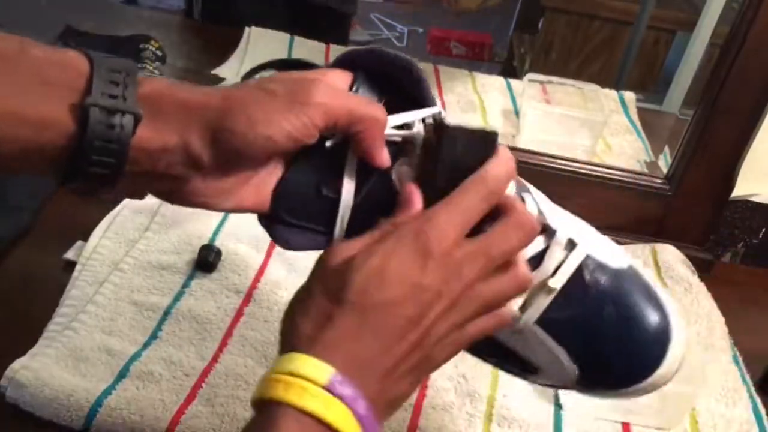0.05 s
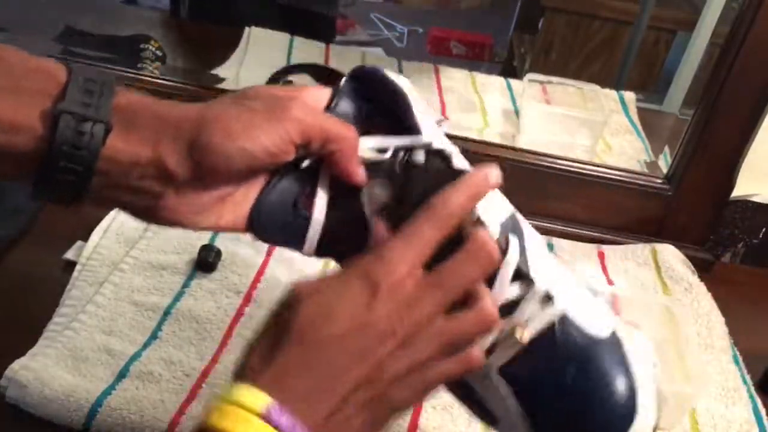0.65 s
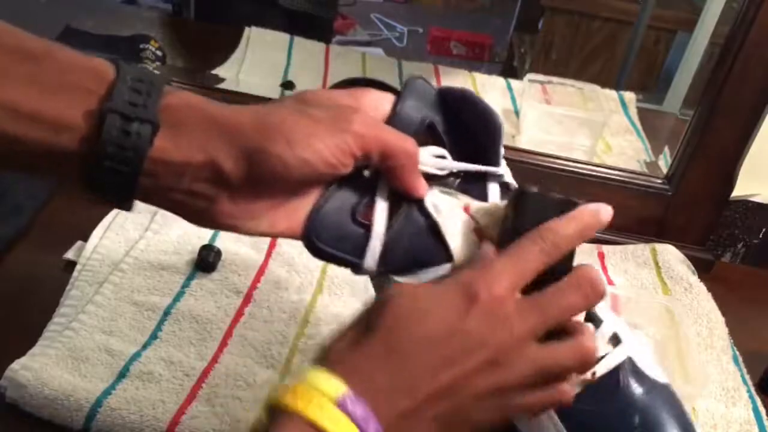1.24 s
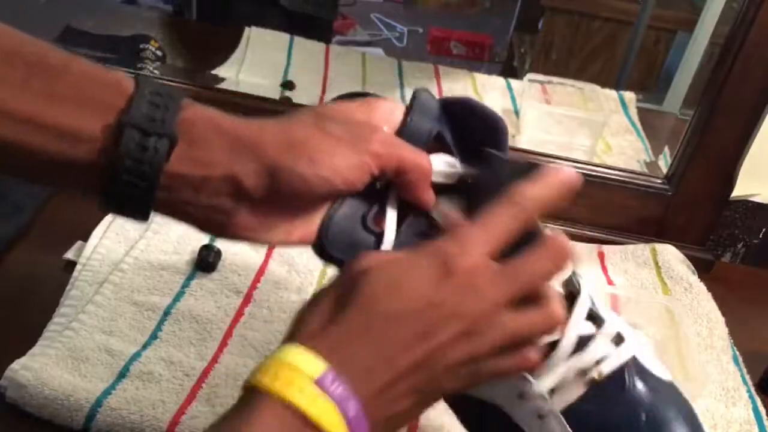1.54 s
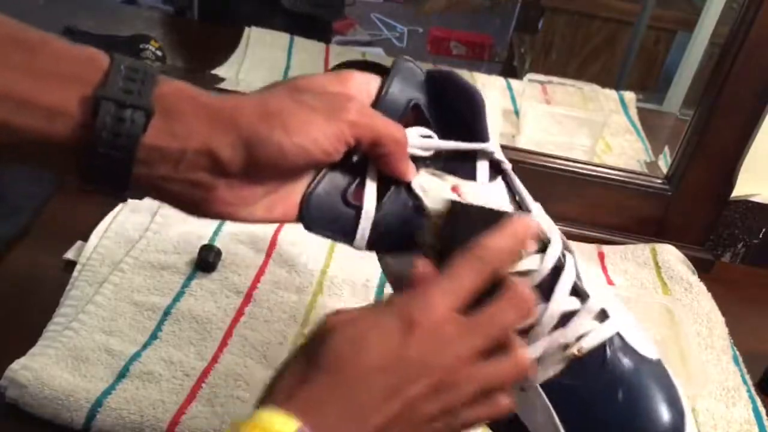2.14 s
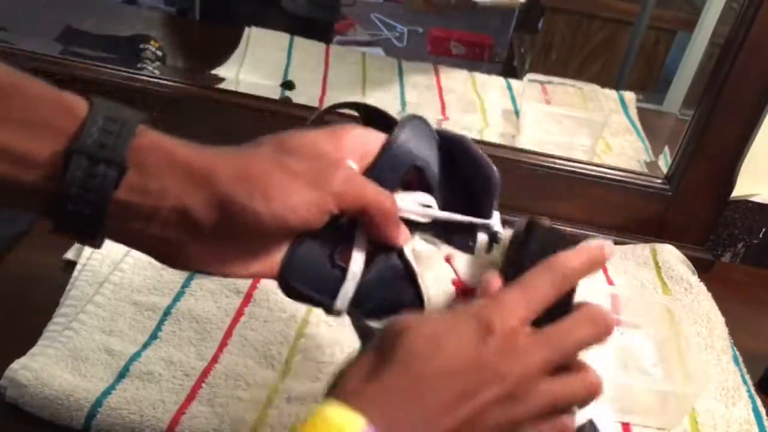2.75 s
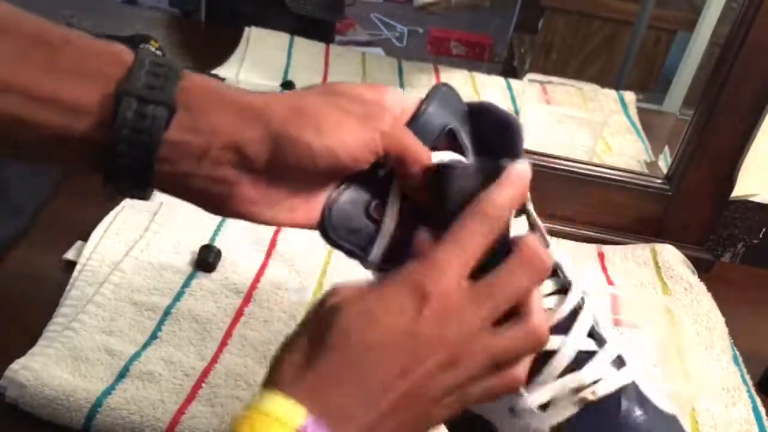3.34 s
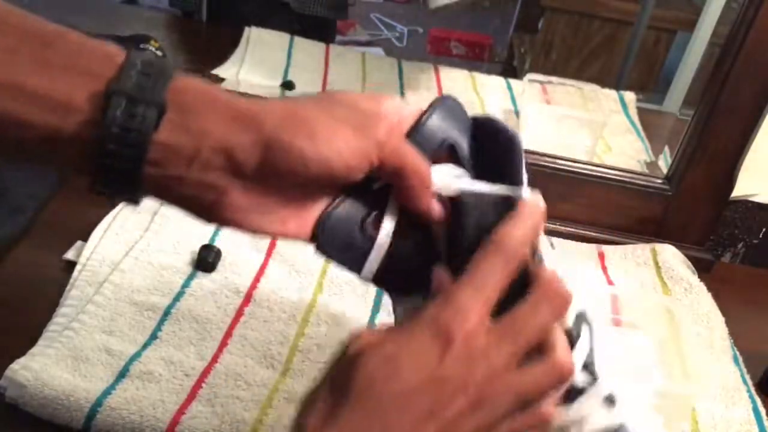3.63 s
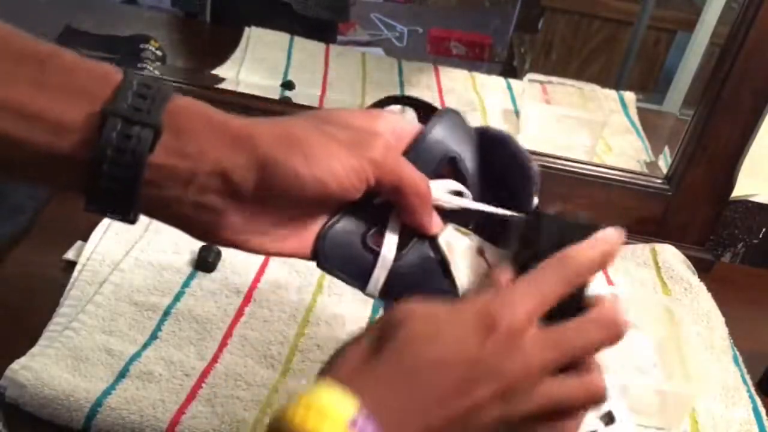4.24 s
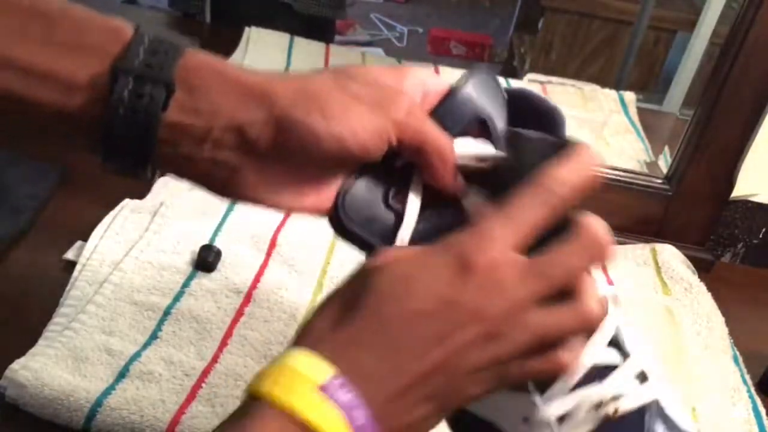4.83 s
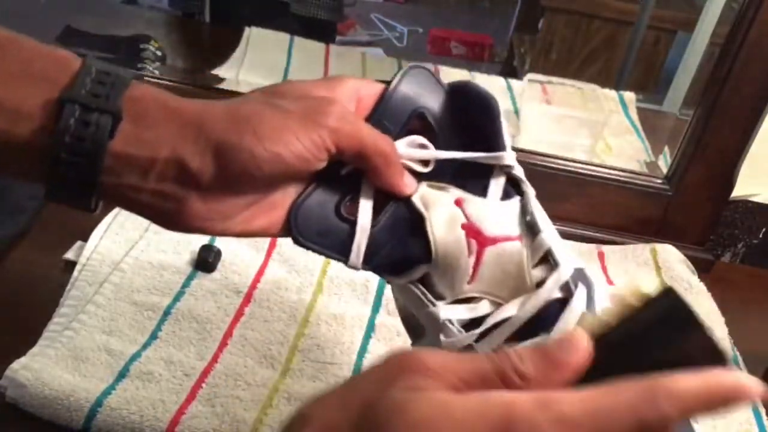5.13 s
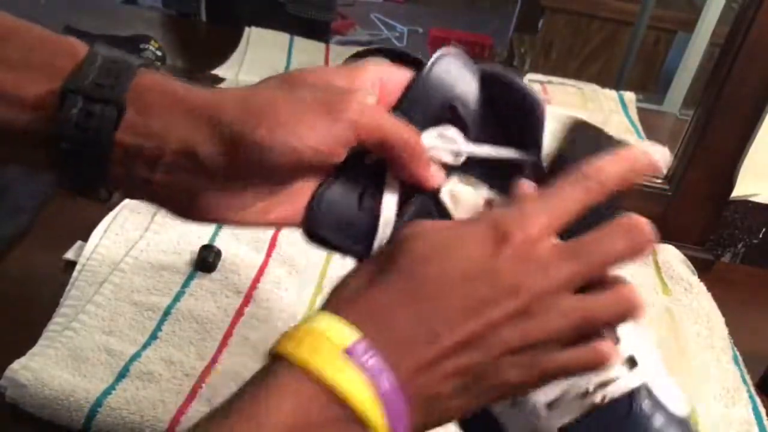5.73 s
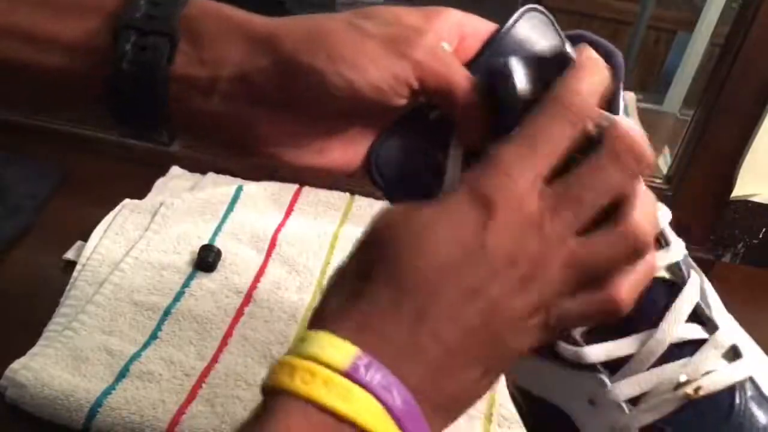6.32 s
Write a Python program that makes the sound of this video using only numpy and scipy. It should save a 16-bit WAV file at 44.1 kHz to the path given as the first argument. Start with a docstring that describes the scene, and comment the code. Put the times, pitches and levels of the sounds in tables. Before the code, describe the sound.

A small brush scrubs the wet fabric tongue of a sneaker, about eight strokes a second, with a bright hiss and a dry rasp. The hollow shoe murmurs under the rubbing and gives soft knocks when bumped. Near the end the brush lifts for a moment, slides softly over a lace and scrubs again. The sound is close, in a furnished room with a low rumble and machine hum.

```python
"""A small brush scrubs the wet tongue of a sneaker, about eight strokes a second, close by indoors.
Stick-slip friction makes the bristle tips hiss on the fabric and the bent bristles rasp in their block.
The hollow shoe resonates: it murmurs under the rubbing and knocks when bumped.
The brush lifts once for a moment, then settles with a soft slide over a lace.
The room adds faint reflections, and a low rumble with a machine hum lies underneath."""
import sys
import numpy as np
from scipy import signal
from scipy.fft import rfft, irfft
from scipy.io import wavfile

SR = 44100
rng = np.random.default_rng(int(sys.argv[2]) if len(sys.argv) > 2 else 0)


def store_pcm(level_fs):
    """Save levels as 16-bit WAV."""
    pcm = np.round(np.clip(level_fs, -1, 1) * 32767).astype(np.int16)
    wavfile.write(sys.argv[1], SR, np.atleast_2d(pcm).T)


N = 285327
TIME = np.arange(N) / SR
BINS = np.maximum(np.arange(N // 2 + 1) * SR / N, 1)


# spectra of tips on fabric and of bent bristles dragging: (frequency [Hz], level [dB])
HISS_SPECTRUM = [(500, -6.5), (1200, -9.5), (2200, -13), (3500, -2.5), (5400, -3.5), (7000, -3), (9300, -2),
                 (11500, -1), (13000, 0), (15800, -1)]
RASP_SPECTRUM = [(300, -8), (700, -10), (1000, -9), (1300, -7.5), (1600, -1.5), (2300, -2), (3000, -1.3),
                 (3800, -5.5), (5000, -15), (8000, -47), (15000, -38)]
# resonances and antiresonances of brush block and cupped hand: (frequency [Hz], width [Hz], gain [dB])
BRUSH_RESONANCES = [(1600, 380, 0.5), (2242, 116, 7), (2405, 110, 5), (2640, 230, -2), (2750, 114, 5),
                    (7900, 1130, -3.5), (10450, 780, -4)]
# colour of tips pushed against their lean, and trailing: (frequency [Hz], width [Hz], gain [dB])
PUSHED_BANDS = [(3630, 480, -11), (6180, 1140, 2.5), (11100, 4900, -0.5)]
TRAILING_BANDS = [(3460, 3100, 2), (4640, 280, 0.5), (5530, 1000, 2.5), (8270, 540, 2), (12300, 13000, 4.5)]

def bristles(drive, speed, bend, push_share, rasp_ratio):
    """Stick-slip friction: tips slip over the weave, more often at speed, and the clicks fuse to noise."""
    flutter = undb(0.54 * walk(104))  # tufts catch and let go together
    hiss = 0
    for share, lean in [(push_share, PUSHED_BANDS), (1 - push_share, TRAILING_BANDS)]:
        tips = slips(9000 + 30000 * speed, spread_db=2)
        hiss += np.sqrt(share) * colour(tips, HISS_SPECTRUM, BRUSH_RESONANCES + lean)
    rasp = colour(slips(4000 + 8000 * speed, spread_db=1), RASP_SPECTRUM, BRUSH_RESONANCES)
    rasp *= undb(0.5 * walk(61))
    # the rasp grows with the bend and depends less on speed than the hiss
    bite = undb(-3 + bend * (2 + push_share)) * rasp_ratio / speed ** 0.28
    pressure = undb(0.5 * walk(17))
    return drive * pressure * flutter * (undb(2.18) * hiss + bite * rasp)


# strokes, drawn and pushed in turn, a draw first: (time [s], duration [s], level [dB])
BRUSH_STROKES = [(0.006, 0.092, -52), (0.04, 0.12, -62.5), (0.175, 0.14, -46.5), (0.33, 0.12, -47.5),
                 (0.44, 0.135, -44), (0.559, 0.17, -49.0), (0.67, 0.15, -44.5), (0.787, 0.18, -45.0),
                 (0.919, 0.128, -41), (1.023, 0.174, -44.0), (1.155, 0.14, -39.5), (1.265, 0.189, -44.5),
                 (1.41, 0.13, -39.5), (1.49, 0.21, -44.5), (1.647, 0.13, -39.5), (1.739, 0.2, -43.0),
                 (1.879, 0.15, -39), (2.007, 0.21, -42.5), (2.125, 0.18, -40), (2.28, 0.16, -45),
                 (2.412, 0.13, -37.5), (2.47, 0.24, -47.5), (2.662, 0.16, -45.5), (2.784, 0.173, -42.0),
                 (2.939, 0.13, -42.0), (3.044, 0.16, -42), (3.155, 0.17, -38.5), (3.286, 0.15, -44),
                 (3.412, 0.13, -38.5), (3.493, 0.19, -44), (3.648, 0.161, -43), (3.723, 0.22, -46),
                 (3.898, 0.17, -42.5), (4.001, 0.214, -46.5), (4.171, 0.15, -41.5), (4.217, 0.29, -45.5),
                 (4.444, 0.14, -41), (4.526, 0.25, -44), (4.678, 0.2, -41), (4.798, 0.24, -45.5),
                 (4.949, 0.1, -42), (5.219, 0.16, -75.5), (5.311, 0.18, -46.5), (5.494, 0.14, -43.5),
                 (5.636, 0.153, -44.5), (5.759, 0.18, -39.5), (5.902, 0.15, -41.5), (5.998, 0.171, -47),
                 (6.171, 0.14, -39.5), (6.286, 0.11, -39), (6.401, 0.097, -38.0)]
# spans in which the bristles rest on the shoe: (touch time [s], lift time [s])
CONTACT_SPANS = [(0.02, 5.02), (5.328, 6.5)]
USUAL_STROKE_DB = -44

def hand_motion(touch_s=0.01, lift_s=0.041, creep_db=-61, creep_speed=0.3):
    """Reciprocating motion: each stroke swells and fades, and incoherent friction noises add in power."""
    contact = sum(np.clip(np.minimum((TIME - touch) / touch_s, 1 - (TIME - lift) / lift_s), 0, 1)
                  for touch, lift in CONTACT_SPANS)
    hiss_power = (undb(creep_db) * contact) ** 2 + 1e-14  # the tips still creep at the turns
    rasp_power, push_power = hiss_power * undb(-3.5) ** 2, hiss_power / 2
    speed, bend = np.full(N, creep_speed), np.zeros(N)  # shares of full speed and full bend
    for i, (start, length, db) in enumerate(BRUSH_STROKES):
        pushing = i % 2
        sharpness, rasp_db = (1.32, -1.8) if pushing else (1.98, -5)  # pushes are broad, draws peaked
        rasp_db += 0.29 * (USUAL_STROKE_DB - db)  # lighter strokes are duller
        now = slice(*np.searchsorted(TIME, [start, start + length]))
        swing = abs(np.sin(np.pi * (TIME[now] - start) / length)) ** sharpness
        power = (undb(db) * swing) ** 2
        hiss_power[now] += power
        push_power[now] += power * pushing
        rasp_power[now] += power * undb(rasp_db) ** 2
        speed[now] = np.maximum(speed[now], swing)
        bend[now] = np.maximum(bend[now], swing ** 2)  # bristles bend furthest at full speed
    drive, rasp_ratio = np.sqrt(hiss_power), np.sqrt(rasp_power / hiss_power)
    return contact, drive, speed, bend, push_power / hiss_power, rasp_ratio


# bristles flick off an edge as the brush lands: (time [s], level [dB])
BRISTLE_FLICKS = [(0.0247, -32), (0.028, -30.5), (0.11, -44), (5.332, -43)]

def flicks(decay_s=0.0035):
    """Elastic release: a bent bristle springs free with a short, bright tick."""
    envelope, t = np.zeros(N), TIME[:SR // 50]
    spectrum = [(800, -22), (3000, 3.5), (8000, -5), (15000, 1)]
    snap = colour(rng.standard_normal(N), spectrum, BRUSH_RESONANCES)
    for start, db in BRISTLE_FLICKS:
        add(envelope, start, undb(db) * np.exp(-t / decay_s) / 2)
    return envelope * snap


# centre of the notch, moving with the grip: (time [s], frequency [Hz])
NOTCH_PATH = [(0, 5000), (.55, 4970), (.95, 4100), (1.5, 4270), (2.9, 4600), (3.7, 4880), (4.6, 4900),
              (6.47, 4900)]

def cupped_hand(x, depth_db=-4, width_hz=550):
    """Antiresonance: the hollow between hand and shoe weakens a narrow band of the scrubbing."""
    hz, t, frames = signal.stft(x, SR, nperseg=512)
    off_centre = hz[:, None] - np.interp(t, *np.transpose(NOTCH_PATH))
    notch = undb(depth_db * .5 ** ((2 * off_centre / width_hz) ** 2))
    return signal.istft(frames * notch, SR, nperseg=512)[1][:N]


# the settling brush slides over a lace: (time [s], duration [s], level [dB])
LACE_SLIDES = [(5.212, 0.13, -63), (5.446, 0.099, -55)]
# spectrum of the sliding: (frequency [Hz], level [dB])
LACE_SPECTRUM = [(700, -18), (1400, -6), (1800, 5), (2100, 3), (2700, -4), (3400, -17), (5000, -24),
                 (12000, -32)]

def lace_slides():
    """Sliding friction under a light load gives a soft, dull rub."""
    swell = sum(undb(db) * np.sin(np.pi * np.clip((TIME - start) / length, 0, 1))
                for start, length, db in LACE_SLIDES)
    return swell * colour(slips(3000, spread_db=1), LACE_SPECTRUM)


# spectrum of the rubbed shoe: (frequency [Hz], level [dB])
SHOE_SPECTRUM = [(120, -8), (250, -13), (340, -0.5), (520, 0), (620, -6), (780, -15.5), (1200, -21),
                 (2500, -42)]
# resonances and antiresonances of its cavity: (frequency [Hz], width [Hz], gain [dB])
CAVITY_RESONANCES = [(488, 140, 2), (606, 35, -6.5), (647, 29, 6), (832, 63, -19), (871, 39, 16.5)]

def shoe_murmur(contact, drive, speed):
    """Forced vibration: coarse catches on seams and eyelets excite the hollow shoe."""
    catches = colour(slips(1500, spread_db=2.5), SHOE_SPECTRUM, CAVITY_RESONANCES)
    load = contact * (drive / undb(USUAL_STROKE_DB)) ** 0.35  # a light touch murmurs less
    return undb(-53.5 + 1.76 * walk(22)) * load * speed ** 0.3 * catches


# the brush bumps the shoe: (time [s], peak level [dB], frequency [Hz], decay time T60 [s])
SHOE_BUMPS = [(.255, -46, 530, 0.076), (0.273, -35.5, 500, 0.072), (.354, -40, 398, .04),
              (.378, -35.5, 483, .055), (.45, -37, 414, 0.027), (.514, -33.5, 484, 0.056),
              (1.074, -36.5, 470, .04), (1.329, -37.5, 447, 0.051), (1.729, -35.5, 530, 0.045),
              (2.518, -37, 458, .05), (2.554, -33, 505, .06), (2.808, -36, 450, .06),
              (3.143, -32.5, 440, 0.021), (3.379, -29.5, 466, 0.016), (4.018, -31.5, 730, 0.014),
              (4.2881, -28.5, 613, 0.022), (5.428, -35.5, 379, 0.083), (5.773, -39, 486, 0.053),
              (5.962, -38, 584, .008), (6.444, -23, 476, 0.028)]
# modes of the bumped shoe: (frequency [ratio], level [dB], decay time [ratio])
BUMP_MODES = [(.7, -3, 0.55), (1, 10.5, 0.81), (1.2, -1.5, 0.38), (1.55, -8.5, 0.35), (3.6, -7, 0.45)]

def shoe_knocks(contact_s=0.0012, wall_s=0.0115, wall_db=-13, echo_db=-19, echo_t60=0.17):
    """Damped free vibration: soft impacts ring the shoe's modes; a wall and the room answer faintly."""
    out, t = np.zeros(N), TIME[:SR // 5]
    for start, db, hz, t60 in SHOE_BUMPS:
        ring = sum(undb(mode_db) * decay(t, t60 * share) * np.sin(2 * np.pi * hz * ratio * t)
                   for ratio, mode_db, share in BUMP_MODES)
        ring *= 1 - np.exp(-(t / contact_s) ** 2)  # soft contact rounds the onset
        ring *= undb(db) / abs(ring).max()
        echo = signal.fftconvolve(ring, rng.standard_normal(len(t)) * decay(t, echo_t60))[:len(t)]
        add(out, start, ring)
        add(out, start + wall_s, undb(wall_db) * ring + undb(db + echo_db) * echo / abs(echo).max())
    return out


def early_reflections(x, wet_db=-15, t60=0.074, count=14):
    """Interference: echoes from table top, mirror and walls ripple the spectrum."""
    response = np.zeros(SR // 25)
    lags = rng.integers(SR // 600, len(response) // 2, count)
    response[lags] = rng.choice([-1, 1], count) * decay(lags / SR, t60)
    return x + undb(wet_db) * signal.fftconvolve(x, response / np.linalg.norm(response))[:N]


def reverberation(x, wet_db=-22, t60=0.53, cutoff_hz=6000):
    """Absorption: the furnished room leaves only a faint, dull diffuse tail."""
    t = TIME[:SR // 2]
    lowpass = signal.butter(1, cutoff_hz, fs=SR, output="sos")
    response = signal.sosfilt(lowpass, rng.standard_normal(len(t))) * decay(t, t60)
    return x + undb(wet_db) * signal.fftconvolve(x, response / np.linalg.norm(response))[:N]


# spectrum of the rumble: (frequency [Hz], level [dB])
RUMBLE_SPECTRUM = [(20, -13), (30, -21), (43, 1.5), (53, -6), (65, 0), (85, -4.5), (105, -6), (138, -21.5),
                   (185, -11.5), (215, -24), (260, -20), (550, -35), (2000, -47.5), (5000, -56.5),
                   (12000, -50.5)]
# peaks and dips of the room modes: (frequency [Hz], width [Hz], gain [dB])
STANDING_WAVES = [(30, 4, -4), (43, 9.3, -6), (51.3, 3.7, 8), (75, 9.4, 4), (93, 5, 2), (99, 5.4, 3),
                  (249, 8.5, 3.5), (304.6, 11, 7.5)]

def room_rumble(level_db=-44):
    """Standing waves: the room's modes colour a steady low noise."""
    return undb(level_db) * colour(rng.standard_normal(N), RUMBLE_SPECTRUM, STANDING_WAVES)


# the hum swells and sinks: (time [s], level [dB])
HUM_LEVELS = [(0, -63), (1.5, -50.5), (2.7, -50.5), (3.2, -42), (3.6, -47), (4.1, -40.5), (4.6, -46.5),
              (5.2, -45.5), (6.47, -50)]
# weaker tones in the room: (frequency [Hz], level [dB])
WEAK_TONES = [(156.1, -68), (236.9, -72)]

def machine_hum(hum_hz=75.3, drift_hz=0.57, waver_db=2.05):
    """Periodic vibration: a machine's low tone and two weaker ones waver in pitch and level."""
    out = np.zeros(N)
    hum_db = np.interp(TIME, *np.transpose(HUM_LEVELS))
    for hz, db in [(hum_hz, hum_db)] + WEAK_TONES:
        phase = 2 * np.pi * np.cumsum(hz + drift_hz * walk(2.5)) / SR
        out += np.sqrt(2) * undb(db + waver_db * walk(2.4)) * np.sin(phase)
    return out


def undb(db):
    """Logarithmic level: decibels to amplitude ratio."""
    return 10 ** (np.asarray(db) / 20)


def decay(t, t60):
    """Exponential damping: a fall of 60 dB in t60 seconds."""
    return undb(-60 * t / t60)


def colour(x, outline, peaks=()):
    """Linear filtering by a (Hz, dB) outline and bell-shaped (Hz, width, dB) peaks, scaled to rms 1."""
    hz, db = np.transpose(outline)
    curve = np.interp(np.log(BINS), np.log(hz), db)
    for centre, width, gain in peaks:
        curve += gain * .5 ** ((2 * (BINS - centre) / width) ** 2)
    filtered = irfft(rfft(x) * undb(curve), N)
    return filtered / np.std(filtered)


def walk(rate_hz):
    """Random modulation: noise low-passed at rate_hz, with spread 1."""
    wander = irfft(rfft(rng.standard_normal(N)) / (1 + (BINS / rate_hz) ** 4), N)
    return wander / np.std(wander)


def slips(rate, spread_db):
    """Shot noise: stick-slip clicks of uneven size, rate of them a second, at constant power."""
    chance = np.clip(rate / SR, 1e-4, 1)
    size = rng.standard_normal(N) * undb(spread_db * rng.standard_normal(N))
    return (rng.random(N) < chance) * size / np.sqrt(chance)


def add(out, start, sound):
    """Superposition: mix a sound in at its start time."""
    i = int(start * SR)
    out[i:i + len(sound)] += sound[:N - i]


def scene():
    """Superposition: brush, shoe and room sum at one point, alike in both channels."""
    contact, drive, speed, bend, push_share, rasp_ratio = hand_motion()
    brush = cupped_hand(bristles(drive, speed, bend, push_share, rasp_ratio) + flicks())
    scrubbing = brush + lace_slides() + shoe_murmur(contact, drive, speed)
    mono = reverberation(early_reflections(scrubbing)) + shoe_knocks() + room_rumble() + machine_hum()
    return np.array([mono, mono])


def record(dry, cutoff_hz=15800):
    """Band limiting: a steep low-pass filter removes the highest treble."""
    return signal.sosfilt(signal.ellip(12, .1, 70, cutoff_hz, fs=SR, output="sos"), dry)


dry = scene()
out = record(dry)
store_pcm(out)
```